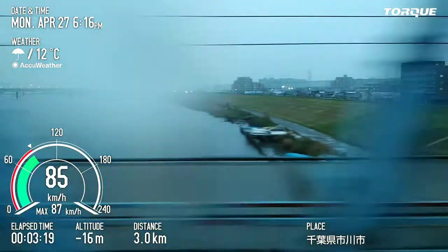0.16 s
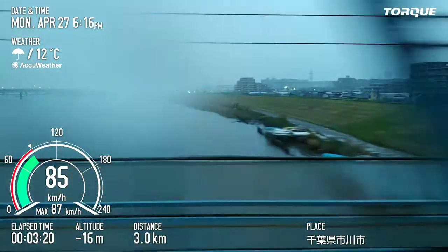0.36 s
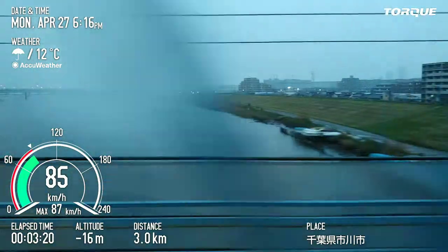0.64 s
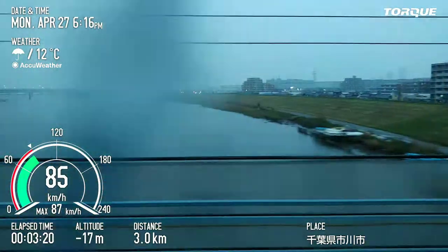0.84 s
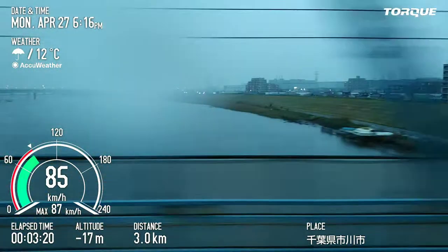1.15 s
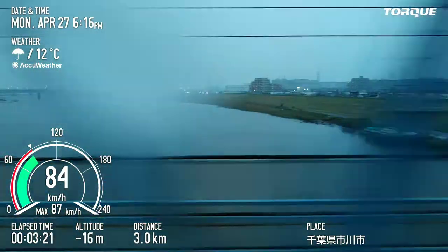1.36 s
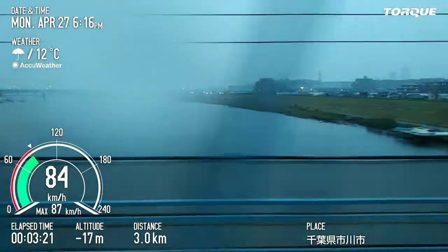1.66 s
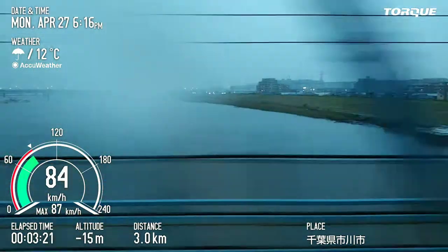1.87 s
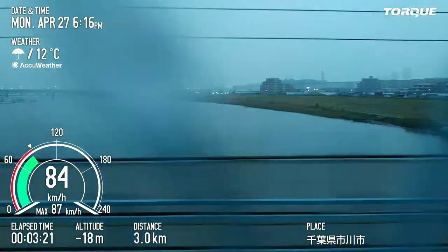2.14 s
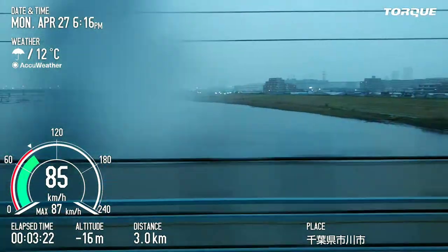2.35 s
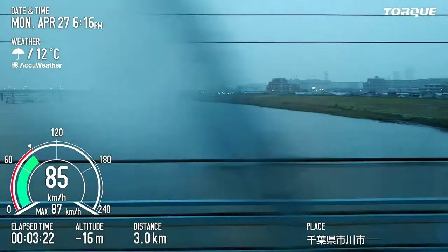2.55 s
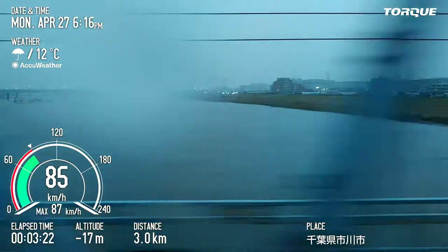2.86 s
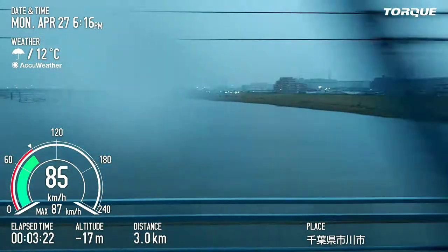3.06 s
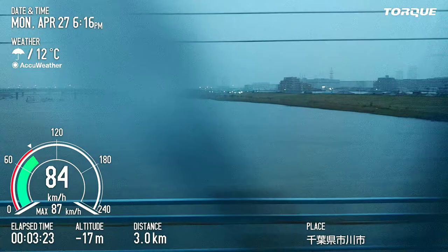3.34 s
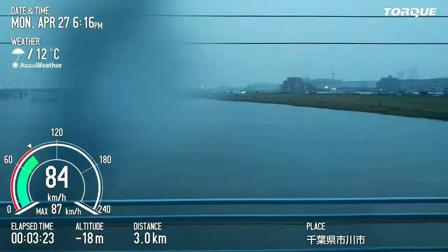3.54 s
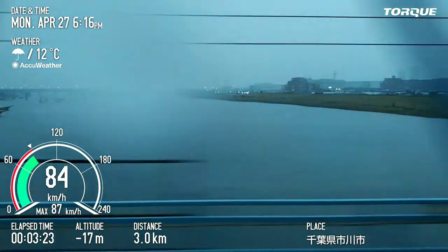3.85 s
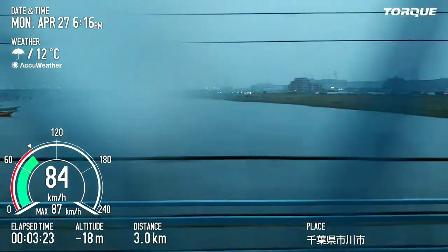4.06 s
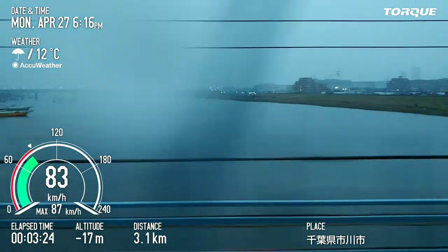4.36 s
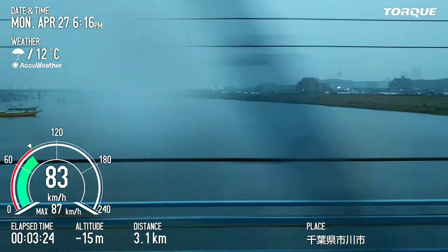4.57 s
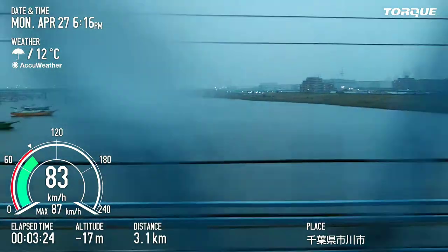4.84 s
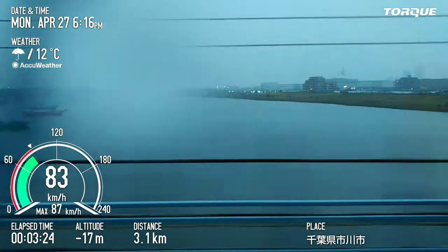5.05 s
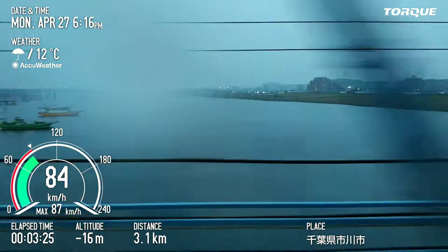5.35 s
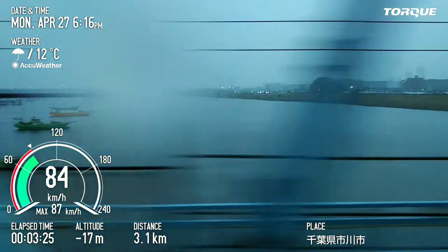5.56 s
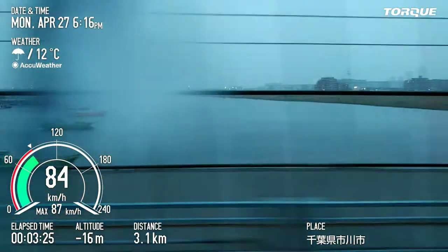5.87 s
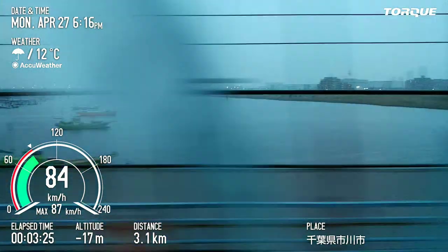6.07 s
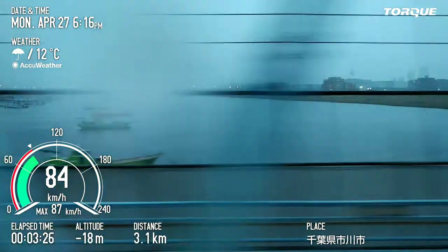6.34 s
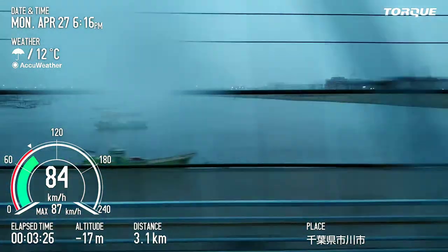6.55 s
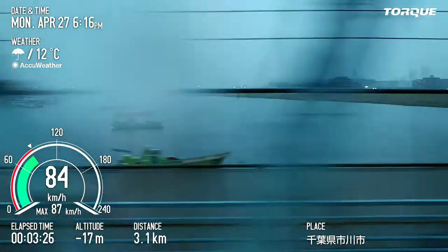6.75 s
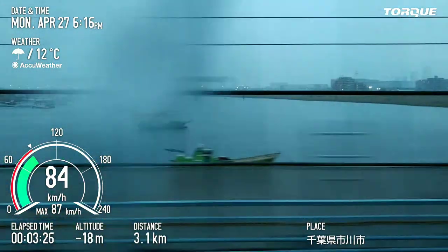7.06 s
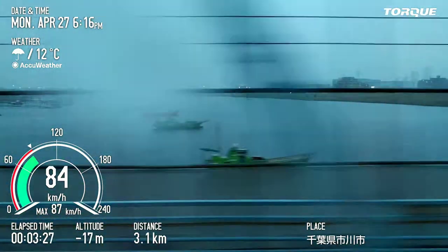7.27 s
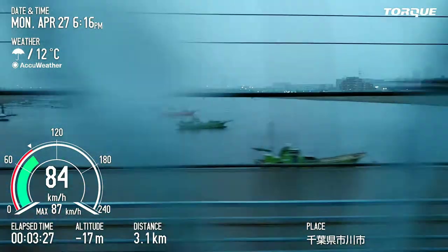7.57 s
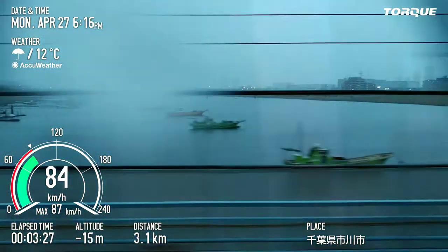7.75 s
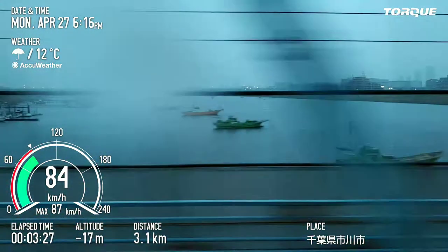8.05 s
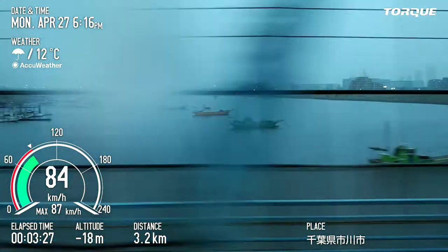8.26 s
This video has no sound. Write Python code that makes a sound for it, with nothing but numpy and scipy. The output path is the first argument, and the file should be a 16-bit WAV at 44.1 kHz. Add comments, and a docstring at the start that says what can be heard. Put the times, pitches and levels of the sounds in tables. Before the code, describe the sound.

Inside a train crossing a steel bridge, a loud steady rumble carries rhythmic wheel clatter and harder clanging knocks.

```python
"""Commuter train on a truss bridge

Inside a train crossing a steel bridge at about 85 km/h: shaped noise swells as each of six axles, on
three bogies, meets a rail joint about once a second. Harder knocks thud, clang and ring as noise bursts.
Noise makes the bogies' rumble, the window's hiss and a fitting's ticks; wavering sines make boom and hum.
Slow pressure waves rock the cabin air, and the strongest clip the microphone, choking the rest briefly.
"""
import sys
import numpy as np
from scipy import signal
from scipy.fft import rfft, irfft, next_fast_len
from scipy.io import wavfile
from scipy.ndimage import map_coordinates

SR = 44100
rng = np.random.default_rng(int(sys.argv[2]) if len(sys.argv) > 2 else 0)


def generate_wav(sig):
    """Save sig (samples, or channels by samples) to the path in sys.argv[1] as 16-bit PCM at SR."""
    pcm = np.round(np.clip(np.atleast_2d(sig).T, -1, 1) * 32767).astype(np.int16)
    wavfile.write(sys.argv[1], SR, pcm)


N = 370881

SLOWING_PER_S = 0.0004  # share of the starting speed lost each second
SWELL_S = 0.059  # a wheel rolls through the dip of a joint in this time
TOP_HZ = 13900  # upper edge of the recorder's band

# Rail joints, one every 25 m, with the offset each gives to the axle levels:
# first axle at t/s, then thump, roar, rolling, rush and sizzle as level/dB
RAIL_JOINTS = [(-0.388, 0, 0, -6.5, -2, -8), (0.679, -9, -2.5, -4.5, -3, -5),
               (1.737, -2.5, -1.1, -4.5, -1, -3.5), (2.796, -2.5, -1, -6, -6, -5.5),
               (3.869, -6.5, -2, -7, -5, -16), (4.935, 0.5, -1, -2.5, -5, -5.5),
               (6.001, 1, 1.5, 1, -0.5, -9), (7.081, 0, -2, -1.5, -6.5, -5), (8.15, -2.5, -7, -8, 2, -2.5)]
# The six axles within earshot, two to a bogie, each as it sounds on a joint before the joint's offset:
# delay after the first axle t/s, then floor drumming, roar, rail rolling, rail rush, window hiss level/dB
AXLE_SWELLS = [(0.0, -27, -30.5, -35.5, -55, -52.5), (0.1, -33.5, -31, -39, -54, -51),
               (0.236, -33, -33.5, -31, -56, -51), (0.315, -32, -28, -29.5, -48, -48),
               (0.494, -28.5, -30.5, -31, -48, -47), (0.578, -29.5, -30.5, -31, -45, -46)]
# Roughness of the track between joints, added to the steady levels: t/s, level/dB
TRACK_ROUGHNESS = [(0, 1), (.9, 0.5), (1.6, 0), (2.7, 0), (3.7, 0.5), (4.7, 0.44), (5.8, 2), (7, 2.5),
                   (8.41, 1.5)]
# The hardest knocks of a wheel on the track:
# t/s, floor thump level/dB, panel roar level/dB, bogie clang level/dB, rail ring level/dB, t60/s
HARD_KNOCKS = [(0.155, -23, -32, -42, -48.0, 0.57), (0.23, -23.0, -27, -46, -39.5, 0.45),
               (0.7, -22.5, -33.5, -48.0, -48.0, 0.6), (0.795, -21, -35.5, -48.0, -48.0, 0.34),
               (0.955, -32.5, -45, -26.5, -48.0, 0.6), (1.044, -30, -30, -44, -27, 0.32),
               (1.245, -24.5, -23, -30.5, -31, 0.52), (1.39, -24.0, -34.0, -29.0, -48.0, 0.17),
               (1.771, -48.0, -26.5, -31.5, -39, 0.45), (1.91, -48.0, -41.5, -30, -42, 0.31),
               (1.99, -40.0, -48.0, -26.5, -48.0, 0.35), (2.125, -25, -48.0, -29, -32.5, 0.23),
               (2.32, -26, -48.0, -31.5, -48.0, 0.66), (2.995, -27, -48.0, -48.0, -46, 0.33),
               (3.16, -22, -50, -32, -50, 0.52), (3.36, -34, -28.0, -35, -50, 0.73),
               (3.91, -46, -27.5, -29.5, -48.0, 0.45), (4.125, -25, -39, -28.5, -35.0, 0.51),
               (4.22, -21.5, -28, -25.5, -34, 0.57), (4.385, -17.0, -27.5, -29, -34, 0.4),
               (4.48, -19.5, -20.5, -48.0, -31, 0.45), (4.535, -36, -33, -34.5, -41, 0.84),
               (4.975, -48.0, -25, -32.5, -41.0, 0.52), (5.06, -24, -33, -30, -48.0, 0.22),
               (5.204, -29, -31.0, -30, -37.0, 0.37), (5.28, -35, -32, -50, -30.5, 0.8),
               (5.495, -20.5, -27, -32.0, -30.0, 0.4), (5.595, -22.0, -23, -37.0, -29, 0.26),
               (6.049, -31.0, -46.0, -36, -31.5, 0.57), (6.16, -42.5, -48.0, -48.0, -30, 0.33),
               (6.349, -32, -48.0, -24.5, -32, 0.41), (6.58, -27.5, -48.0, -26.5, -38, 0.42),
               (6.614, -48.0, -26.0, -23, -27, 0.36), (6.86, -41, -24.5, -26.5, -43.5, 0.48),
               (7.125, -41, -26.5, -23, -48.0, 0.38), (7.365, -39, -34.5, -27.0, -28.5, 0.45),
               (7.435, -27, -24, -25.5, -30, 0.46), (7.605, -27, -32, -22.5, -44, 0.59),
               (7.701, -22.5, -48.0, -24, -36, 0.39), (8.185, -48.0, -25.5, -34, -40, 0.55),
               (8.295, -48.0, -32.5, -29, -36, 0.8)]
# Running gear: t/s, rumble level/dB, boom of the car body level/dB
BOGIE_LEVELS = [(0, -25.5, -44), (.3, -30.5, -36), (.42, -27.5, -36), (.58, -28, -35), (.9, -27, -38),
                (1.7, -30, -34), (2.0, -30, -39), (2.22, -23, -40), (2.5, -32, -33), (2.65, -29.5, -32),
                (2.85, -29, -34), (3.1, -29.5, -36), (3.35, -30.5, -37), (3.9, -26.5, -32), (4.4, -28, -35),
                (4.6, -26.5, -26.5), (4.85, -30.5, -26), (5.2, -27.5, -28), (5.38, -29.5, -38),
                (5.6, -24.5, -33), (5.95, -30.5, -39), (6.2, -25.5, -35), (6.9, -27.5, -44),
                (7.3, -25, -40), (7.9, -28, -45), (8.12, -29.5, -46), (8.41, -26, -48)]
# Gear whine of the drive: t/s, level/dB
WHINE_LEVELS = [(0.0, -64), (1.0, -54), (2.3, -47), (3.8, -46), (4.4, -54), (4.85, -39.5), (5.3, -50),
                (5.6, -43.5), (6.0, -41.5), (6.45, -57), (7.1, -39), (7.55, -54), (8.0, -38), (8.41, -47)]
# Gusts of hiss at the window: t/s, level/dB, half width to 1/e in t/s
WINDOW_GUSTS = [(0.24, -50.5, 0.076), (1.06, -53, 0.14), (1.3, -58, .06), (2.03, -51, .035),
                (2.14, -49.5, .04), (2.38, -51, .05), (3.34, -56, 0.022), (3.43, -48, 0.031),
                (4.24, -50.5, 0.091), (4.42, -53, 0.027), (4.52, -52, 0.067), (5.31, -54, .04),
                (5.58, -52, .06), (6.38, -53, 0.044), (6.58, -53, .04), (6.66, -54, .04), (7.28, -54, .04),
                (7.44, -54, 0.079), (7.63, -55, 0.027), (7.73, -54, 0.063)]
# Thin squeaks of the window seal: t/s, f/Hz, level/dB, half width to 1/e in t/s
SEAL_SQUEAKS = [(3.432, 11250, -45.5, .016), (3.462, 11350, -55, .012)]
# Ticks of a loose window fitting: t/s, bright tick level/dB, duller clack level/dB, t60/s
FITTING_TICKS = [(1.781, -49, -46, 0.17), (2.877, -43, -52, .045), (5.265, -42, -58, .07),
                 (5.466, -48, -59, .08), (6.545, -44, -50, .12)]
# Depth of the slow pressure waves, before they are softly limited: t/s, level/dB
SWAY_LEVELS = [(0, -4), (.7, -16), (1.3, -5), (2.9, -7), (3.4, -6.5), (4.2, -14.5), (4.8, -8.5),
               (5.4, -5.5), (6.1, -10), (6.6, -8.5), (7.3, -15), (8.05, -13), (8.41, -2.5)]
# Strongest pressure surges, before the microphone clips:
# t/s, signed pressure/full scale, half width to 1/e in t/s
PRESSURE_SURGES = [(.046, .85, .034), (.138, -.77, .036), (1.229, .74, .036), (2.305, .6, .03),
                   (3.742, .64, .024), (5.497, .59, .034), (6.46, .62, .025), (7.096, -.75, .026),
                   (7.231, .6, .03), (7.29, -.62, .03), (8.229, .64, .026), (8.29, -.7, .03)]
# Resonances of the car's floor and panels: f/Hz, width/Hz, lift level/dB
PANEL_RESONANCES = [(141, 17, 5), (190, 9.4, 5), (212, 13, 4.5), (295.3, 20, 5.5)]

# Noise spectra, relative density only: f/Hz, level/dB
# wheels on rails: floor drumming, panel roar, rail rolling, bright rail rush
DRUMMING_SPECTRUM = [(50, -42), (95, -9), (125, 1), (165, -3), (215, -4.5), (270, -14), (450, -53)]
ROAR_SPECTRUM = [(120, -22), (200, -12), (250, -0.5), (370, -1), (450, -7), (620, -12.5), (1000, -34.5),
                 (2500, -71)]
ROLLING_SPECTRUM = [(150, -34), (350, -7), (470, 0.6), (550, 3), (630, 2), (700, 0), (880, 0.5),
                    (1020, -2.5), (1150, -6.5), (1240, -11.5), (1380, -15.5), (1520, -12.5), (1800, -22.5),
                    (3000, -35.5), (6000, -82)]
RUSH_SPECTRUM = [(700, -20), (1400, 4), (1750, 0), (2030, 1.5), (2300, -4), (2480, -2.5), (2650, -5.5),
                 (3100, -6), (4100, -7.5), (5300, -12), (6400, -23), (8000, -20.5), (14000, -21)]
# a knock in the bogie and in the rail
CLANG_SPECTRUM = [(200, -24), (400, -4.5), (520, 2), (610, 5.5), (720, -2), (900, -10), (1300, -28),
                  (2200, -28), (5000, -61), (9000, -60)]
RING_SPECTRUM = [(450, -25), (670, -14), (780, 5.5), (1000, 1), (1130, -3.5), (1250, -14), (1380, -16.5),
                 (1520, -16), (2200, -24), (5000, -54)]
# bogie rumble, window hiss
RUMBLE_SPECTRUM = [(12, -20), (21, 1), (27, 4.5), (32, -4), (42, -3), (57, -7.5), (68, -4), (80, -5.5),
                   (97, -5.5), (125, -19.5), (200, -22.5), (400, -100)]
HISS_SPECTRUM = [(2000, -18), (4500, -11), (6300, -14.5), (7200, -10.5), (9000, -9.5), (10600, -5.5),
                 (11900, -0.5), (12800, -3.5), (13800, -9.5), (15000, -20)]
# the fitting's bright tick and duller clack
TICK_SPECTRUM = [(5000, -20), (8000, -16), (10000, -6), (12000, 6), (13200, -4), (14000, -6)]
CLACK_SPECTRUM = [(500, -25), (1800, 0), (4000, -13), (6500, -12), (10000, -16), (14000, -30)]
# slow sway of the cabin air
SWAY_SPECTRUM = [(1, -27), (3, -13.5), (4.2, -1), (5.2, 6.5), (6.6, -4.5), (8.3, -2.5), (10.5, -7),
                 (14, -15), (20, -23), (26, -28), (34, -45), (50, -90)]


def wheels():
    """Rough steel on steel drums the floor, roars in the panels and radiates from the rails."""
    _, thump_db, body_db, rail_db, bright_db, _ = np.transpose(RAIL_JOINTS)
    _, drum_db, roar_db, rolling_db, rush_db, _ = np.transpose(AXLE_SWELLS)
    judder = wobble(40)  # shared by all four bands

    drumming = unit(noise(DRUMMING_SPECTRUM, PANEL_RESONANCES) * amp(1.0 * judder))
    drumming *= ride(thump_db, drum_db, steady_db=-37.0, t60=0.49)

    roar = unit(noise(ROAR_SPECTRUM, PANEL_RESONANCES) * amp(0.85 * judder + 0.58 * wobble(12)))
    roar *= ride(body_db, roar_db, steady_db=-37.0, t60=0.68)

    rolling = unit(noise(ROLLING_SPECTRUM) * amp(0.9 * judder + 0.34 * wobble(70)))
    rolling *= ride(rail_db, rolling_db, steady_db=-37.0, t60=0.62)

    rush = unit(noise(RUSH_SPECTRUM) * amp(0.22 * judder + 0.6 * wobble(120)))
    rush *= ride(bright_db, rush_db, steady_db=-49.5, t60=0.77)
    return drumming + roar + rolling + rush


def ride(joint_db, axle_db, steady_db, t60):
    """Level of one layer: steady rolling on the track plus a swell for each axle on each joint."""
    track_db, = curves(TRACK_ROUGHNESS)
    steady = amp(steady_db + track_db)
    swells = jolts(np.add.outer(joint_db, axle_db), SWELL_S, t60)
    return np.hypot(steady, swells)


def jolts(strength_db, rise, t60):
    """Every axle on every joint rises, then decays; their powers add. strength_db is joints x axles."""
    starts = np.add.outer([row[0] for row in RAIL_JOINTS], [row[0] for row in AXLE_SWELLS])
    t = clock()[::32]  # a coarse grid is enough for a level
    age = np.maximum(t - starts[..., None], 0)
    decay_db = -60 * np.maximum(age - rise, 0) / t60
    each = np.minimum(age / rise, 1) * amp(strength_db[..., None] + decay_db)
    return np.interp(clock(), t, np.sqrt(np.sum(each ** 2, axis=(0, 1))))


def knocks(rise=0.014):
    """Each knock thumps the floor, shakes panels, clangs the bogie and rings the rail, in its own mix."""
    t = clock()[::16]  # a coarse grid is enough for a level
    powers = np.zeros((4, len(t)))
    for s, *levels_db, t60 in HARD_KNOCKS:
        age = np.maximum(t - s, 0)
        envelope = amp(-60 * age / t60) * (1 - np.exp(-age / rise))
        powers += np.outer(amp(levels_db), envelope) ** 2
    thump, roar, clang, ring = [np.interp(clock(), t, np.sqrt(power)) for power in powers]
    floor = thump * noise(DRUMMING_SPECTRUM, PANEL_RESONANCES)
    panels = roar * noise(ROAR_SPECTRUM)
    return floor + panels + clang * noise(CLANG_SPECTRUM) + ring * noise(RING_SPECTRUM)


def cabin_pressure(reach=0.44):
    """The cabin air sways about five times a second within reach; single surges swing further."""
    depth_db, = curves(SWAY_LEVELS)
    sway = amp(depth_db) * noise(SWAY_SPECTRUM)
    pressure = sway / (1 + (sway / reach) ** 4) ** (1 / 4)  # soft limit at reach
    surges = np.zeros(N)
    for s, height, width in PRESSURE_SURGES:
        takeover = np.exp(-((clock() - s) / (2 * width)) ** 4)
        pressure *= 1 - takeover  # the surge replaces the sway around it
        surges += height * bump(s, width)
    return pressure + surges


def running_gear():
    """The bogies rumble as low noise and make the car body boom as a wavering tone."""
    rumble_db, boom_db = curves(BOGIE_LEVELS)
    rumble = amp(rumble_db) * noise(RUMBLE_SPECTRUM)
    boom = amp(boom_db) * tone(hz=47.9, drift=0.0048, flutter_db=1.0)
    return rumble + boom


def drive():
    """The motor shaft hums, the gears whine and the wheel rims sing faintly."""
    whine_db, = curves(WHINE_LEVELS)
    shaft = amp(-39.0) * tone(hz=68.55, drift=0.0199, flutter_db=2.0)
    whine = amp(whine_db) * tone(hz=508.0, drift=0.00078, flutter_db=0.2)
    rims = amp(-65.5) * narrow(centre_hz=2932, width_hz=43)
    return shaft + whine + rims


def window():
    """Air hisses at the window, more with each jolt and in fluttering gusts; the seal squeaks."""
    sizzle_db = np.transpose(RAIL_JOINTS)[-1]
    hiss_db = np.transpose(AXLE_SWELLS)[-1]
    leak = unit(noise(HISS_SPECTRUM) * amp(0.75 * wobble(110)))
    leak *= ride(sizzle_db, hiss_db, steady_db=-54.5, t60=0.75)

    gust_level = sum(amp(db) * bump(s, width) for s, db, width in WINDOW_GUSTS)
    gusts = gust_level * unit(noise(HISS_SPECTRUM) * amp(0.99 * wobble(130)))

    squeaks = np.zeros(N)
    for s, hz, db, width in SEAL_SQUEAKS:
        squeaks += amp(db) * bump(s, width) * narrow(centre_hz=hz, width_hz=250)
    return leak + gusts + squeaks


def fitting():
    """Each tick is a bright burst of noise over a duller clack; both decay at the same rate."""
    t = clock()
    ticks, clacks = np.zeros((2, N))
    for s, tick_db, clack_db, t60 in FITTING_TICKS:
        decay = (t >= s) * amp(-60 * np.abs(t - s) / t60)
        ticks += amp(tick_db) * decay
        clacks += amp(clack_db) * decay
    return ticks * noise(TICK_SPECTRUM) + clacks * noise(CLACK_SPECTRUM)


def speed():
    """Wheel speed over its value at the start: the train eases off very slightly."""
    return 1 - SLOWING_PER_S * clock()


def tone(hz, drift, flutter_db):
    """A sine tied to the wheel speed; its pitch wavers and its strength flutters within bounds."""
    pitch_hz = hz * speed() * (1 + drift * wobble(6))
    phase = 2 * np.pi * np.cumsum(pitch_hz) / SR
    flutter = amp(flutter_db * np.tanh(wobble(9)))
    return unit(np.sin(phase) * flutter)


def narrow(centre_hz, width_hz):
    """A fuzzy tone: noise in one narrow resonance, width_hz wide at half amplitude."""
    return coloured(lambda hz: 1 / (1 + (2 * (hz - centre_hz) / width_hz) ** 2))


def noise(spectrum, resonances=()):
    """Noise of rms 1 with a (Hz, dB) spectrum, lifted at each resonance."""
    f, db = np.transpose(spectrum)

    def gain(hz):
        """The spectrum is drawn on a log frequency axis; nothing sounds outside it."""
        level_db = np.interp(np.log(hz + 1e-6), np.log(f), db, left=-120, right=-120)
        for centre, width, lift_db in resonances:
            level_db = level_db + lift_db / (1 + (2 * (hz - centre) / width) ** 2)
        return amp(level_db)

    return coloured(gain)


def coloured(gain):
    """Noise of rms 1 shaped by a gain function of frequency."""
    m = next_fast_len(N + 8192)
    spectrum = rfft(rng.standard_normal(m)) * gain(np.fft.rfftfreq(m, 1 / SR))
    return unit(irfft(spectrum, m)[:N])


def wobble(rate):
    """A smooth random curve of rms 1, rate knots a second."""
    knots = rng.standard_normal(int(N * rate / SR) + 4)
    return unit(map_coordinates(knots, [clock() * rate], mode="mirror"))


def bump(s, width):
    """A bell-shaped swell of height 1 around time s."""
    return np.exp(-((clock() - s) / width) ** 2)


def curves(rows):
    """One value per sample for each column after the time."""
    s, *columns = np.transpose(rows)
    return [np.interp(clock(), s, column) for column in columns]


def clock():
    """The time of every sample in seconds."""
    return np.arange(N) / SR


def amp(db):
    """Decibels to gain."""
    return 10 ** (np.asarray(db) / 20)


def unit(x):
    """Scale to rms 1."""
    return x / np.sqrt(np.mean(x ** 2) + 1e-20)


def scene():
    """Everything as it meets at one microphone by the window."""
    train = wheels() + knocks() + running_gear() + drive()
    cabin = window() + fitting() + cabin_pressure()
    return (train + cabin)[None]


def record(dry):
    """The microphone clips flat at its limit, then the recorder's low-pass removes the top treble."""
    clipped = np.clip(dry, -.705, .705)
    taps = signal.firwin(601, TOP_HZ, fs=SR, window="blackman")
    half = len(taps) // 2
    padded = np.pad(clipped, ((0, 0), (half, half)), mode="edge")
    return signal.fftconvolve(padded, taps[None], mode="valid", axes=1)


dry = scene()
out = record(dry)
generate_wav(out)
```